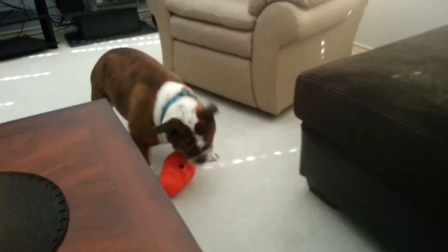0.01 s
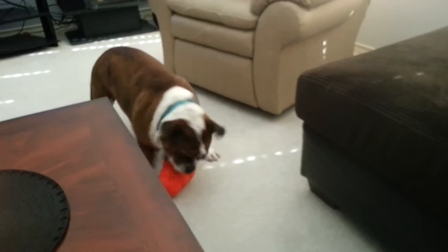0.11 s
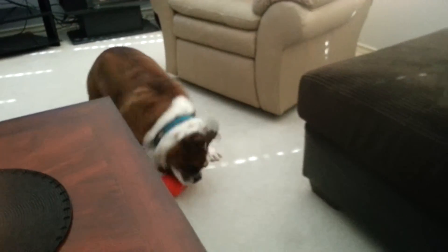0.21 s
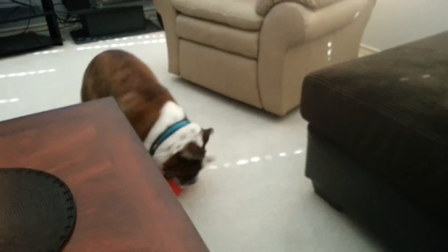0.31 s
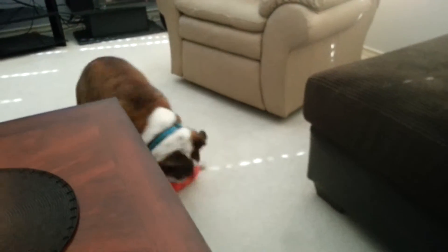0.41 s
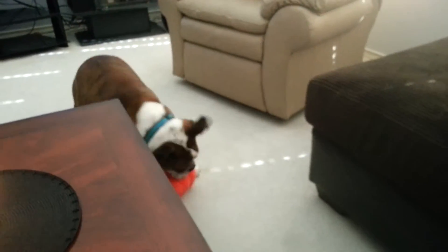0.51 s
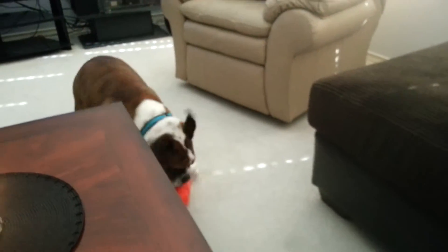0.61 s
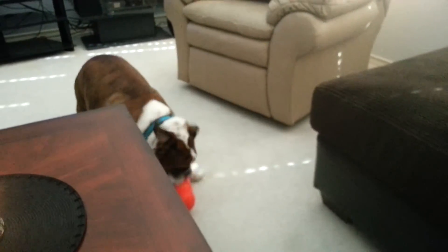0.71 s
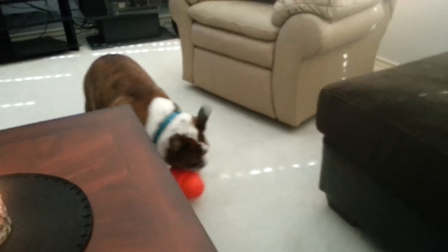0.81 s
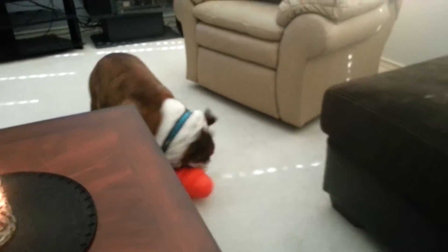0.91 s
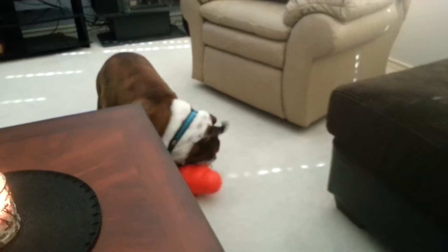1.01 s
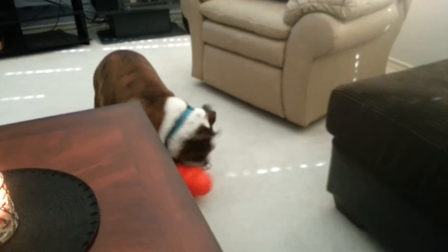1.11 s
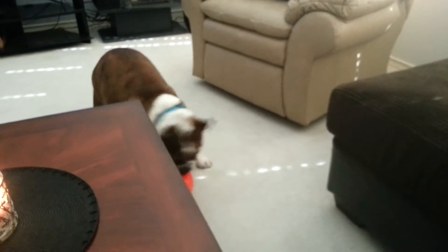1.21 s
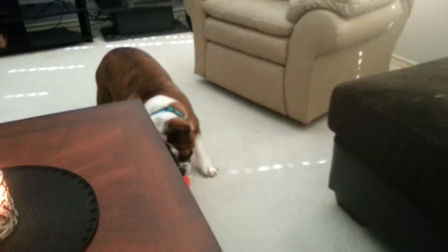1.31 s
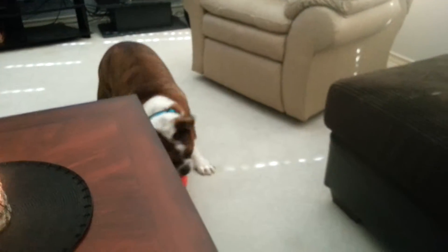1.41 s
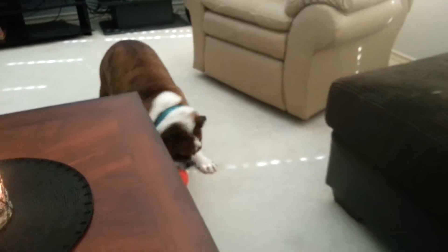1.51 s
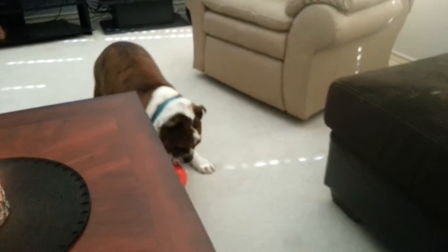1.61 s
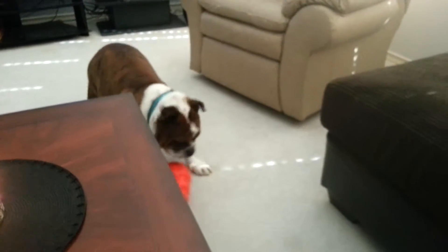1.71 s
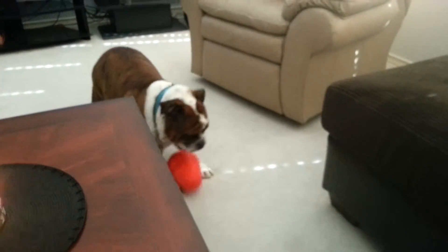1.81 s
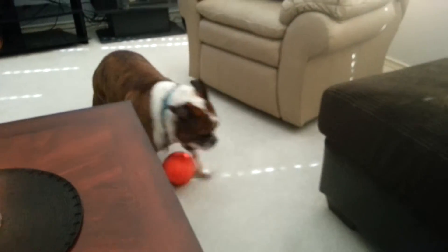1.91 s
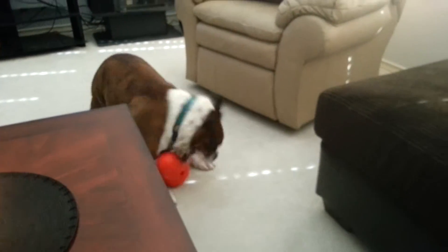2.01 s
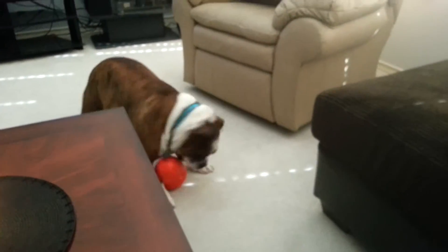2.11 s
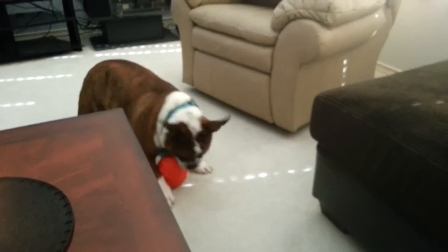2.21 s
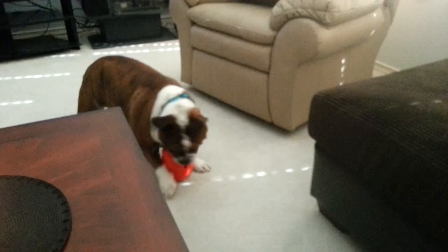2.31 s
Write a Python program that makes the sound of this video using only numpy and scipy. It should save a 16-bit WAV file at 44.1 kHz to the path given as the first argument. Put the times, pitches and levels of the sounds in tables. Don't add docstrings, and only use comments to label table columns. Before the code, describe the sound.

A flat-faced dog gives three rough, fluttering snorts while pushing a hollow rubber ball, with sniffs, scuffs, sharp claw and tooth clicks, soft thumps and jingling tags, in a furnished living room, heard from a phone a couple of metres away.

```python
import sys
import numpy as np
from scipy import signal
from scipy.fft import rfft, irfft, next_fast_len
from scipy.io import wavfile
from scipy.ndimage import uniform_filter1d

SR = 44100
rng = np.random.default_rng(int(sys.argv[2]) if len(sys.argv) > 2 else 0)


def transcribe(u):
    v = np.clip(np.atleast_2d(u).T, -1, 1)
    q = np.round(v * 32767).astype(np.int16)
    wavfile.write(sys.argv[1], SR, q)


def rack_gain(trim_db):
    fader = np.asarray(trim_db, float)
    return 10 ** (fader / 20)


N = 105840
T_S = np.arange(N) / SR
BRIEF_S, SHORT_S, LONG_S = T_S[:400], T_S[:11025], T_S[:22050]


def unit(x):
    return x / np.sqrt(np.mean(x ** 2) + 1e-20)


def band(x, hz, width_hz):
    return signal.lfilter(*signal.iirpeak(hz, hz / width_hz, fs=SR), x)


def body(x, peaks):
    return sum((-1) ** k * rack_gain(db) * unit(band(x, hz, width_hz))
               for k, (hz, width_hz, db) in enumerate(peaks))


def shape(table, hz):
    table_hz, value = np.array(table).T
    return np.interp(np.log(hz + 1), np.log(table_hz), value)


def add(out, start_s, x):
    i = int(start_s * SR)
    out[i:i + len(x)] += x[:N - i]


def ring(hz, t60_s, turn=0.):
    return np.sin(2 * np.pi * (hz * SHORT_S + turn)) * np.exp(-np.log(1000) * SHORT_S / t60_s)


def air():
    # [f/Hz, level/dB per Hz]
    air_spectrum = [(30, -4), (55, -9), (95, -2), (330, 0), (740, -3), (1300, -10), (4800, -9), (6500, -21),
                    (14000, -24)]
    hz = np.fft.rfftfreq(N, 1 / SR)
    mid, side = rfft(rng.standard_normal((2, N))) * rack_gain(shape(air_spectrum, hz))
    side = side * np.clip(hz / 1200, .3, 1)
    return unit(irfft(np.array([mid + side, mid - side]), N)) * rack_gain(-49)


def scuffs():
    # [t/s, swell/s, fade/s per 20 dB, level/dB, centre f/Hz]
    scuff_events = [(0., .005, .15, -45, 900), (.076, .004, .06, -38, 2600), (.078, .01, .06, -44, 1200),
                    (.108, .03, .06, -36, 6500), (.453, .008, .07, -35, 3600), (.555, .01, .25, -45, 950),
                    (.56, .04, .18, -43, 2900), (.74, .03, .15, -45, 2000), (.74, .05, .12, -47, 240),
                    (.905, .035, .06, -44, 6500), (.937, .003, .05, -44, 5500), (.995, .02, .05, -46, 1750),
                    (1.165, .03, .07, -41, 8000), (1.285, .02, .07, -51, 1000),
                    (1.361, .002, .11, -38, 7000), (1.64, .06, .15, -46, 7000),
                    (1.996, .003, .03, -40, 2000), (1.39, .01, .06, -43, 400),
                    (1.817, .004, .075, -32, 3900), (2.003, .02, .06, -33, 4200),
                    (2.006, .02, .06, -35, 8000), (2.08, .01, .08, -37, 4500), (2.17, .04, .08, -48, 2400),
                    (2.17, .04, .07, -52, 7600), (.52, .06, .12, -52, 7600), (1.29, .03, .25, -53, 2800),
                    (1.46, .01, .08, -52, 2750), (.53, .04, .12, -46, 250), (.21, .04, .08, -43, 280),
                    (.22, .03, .08, -43, 1500), (.02, .05, .1, -47, 110), (.88, .05, .1, -50, 110),
                    (1.02, .05, .15, -48, 100), (2.11, .08, .3, -52, 1200), (2.0, .02, .09, -37, 1300),
                    (2.268, .015, .15, -44, 5000), (2.272, .005, .07, -46, 450)]
    grains_hz, grain_db, width_ratio, skirt_db = 9000, 3.5, .7, -4
    out = np.zeros(N)
    for start_s, swell_s, fade_s, db, hz in scuff_events:
        chance, sign, size = rng.random((3, len(LONG_S)))
        grains = (chance < grains_hz / SR) * np.sign(sign - .5)
        grains = grains * rack_gain(-grain_db * np.log(size + .015))
        core = band(band(grains, hz, hz * width_ratio), hz, hz * width_ratio)
        skirt = band(grains, hz, 1.4 * hz)
        tone = unit(core) + rack_gain(skirt_db) * unit(skirt)
        swell = np.minimum(LONG_S / max(swell_s, 1e-3), 1)
        fade = rack_gain(-20 * np.maximum(LONG_S - swell_s, 0) / fade_s)
        add(out, start_s, tone * rack_gain(db) * swell * fade)
    return out


def clicks():
    # [t/s, peak level/dB, pitch f/Hz, rise/s, bright edge re peak/dB]
    click_events = [(.0775, -26, 1300, .0004, -8), (.0783, -28, 2600, .0005, -8),
                    (.089, -28, 1500, .0007, -10), (.2383, -28, 1100, .0005, -8),
                    (.2875, -14, 3250, .0007, -6), (.299, -16, 680, .001, -14), (.319, -13, 700, .0007, -8),
                    (.326, -17, 4400, .0005, -10), (.329, -15, 2370, .0005, -8),
                    (.349, -16, 850, .0007, -10), (.3615, -17, 4200, .0003, -8),
                    (.4511, -14, 3100, .0003, -4), (.4535, -23, 5000, .0005, -8),
                    (.462, -18, 3300, .0004, -4), (.464, -20, 3000, .0004, -6),
                    (.478, -23, 4500, .0005, -8), (.559, -31, 2500, .0004, -6),
                    (1.183, -24, 4280, .0003, -6), (1.711, -24, 1100, .0005, -10),
                    (1.8185, -17, 3900, .001, -2), (1.8305, -22, 4400, .0008, -5),
                    (1.837, -25, 3800, .001, -8), (1.87, -26, 4200, .001, -8),
                    (1.9953, -17, 1200, .0005, -5), (2.0063, -23, 1250, .0005, -6),
                    (2.0078, -17, 3900, .0004, -3), (2.0243, -16, 2600, .0004, -1),
                    (2.0275, -18, 1600, .0004, -3), (2.0335, -23, 8500, .0006, -3),
                    (2.08, -28, 6700, .0003, 0), (2.084, -32, 13500, .0004, -2),
                    (2.088, -26, 6600, .0003, 0), (2.099, -27, 4800, .0008, -6),
                    (2.0241, -21, 12500, .0003, 0), (2.21, -35, 7000, .0003, 0),
                    (2.222, -30, 4800, .0004, -6)]
    upper_ratio, upper_db, edge_s = 1.6, -5, .001
    out = np.zeros(N)
    for start_s, db, hz, rise_s, edge_db in click_events:
        bite = BRIEF_S / rise_s * np.exp(1 - BRIEF_S / rise_s)
        upper = np.sin(2 * np.pi * min(upper_ratio * hz, 15000) * BRIEF_S)
        tone = np.sin(2 * np.pi * hz * BRIEF_S) + rack_gain(upper_db) * upper
        width_hz = 1.8 * min(hz, 6000)
        crack = band(rng.standard_normal(len(BRIEF_S)), hz, width_hz)
        crack = unit(band(crack, min(upper_ratio * hz, 13000), width_hz))
        edge = rack_gain(edge_db) * crack * np.exp(-BRIEF_S / edge_s)
        add(out, start_s, rack_gain(db) * (bite * tone + edge))
    return out


def tags():
    # [t/s, small-tag peak/dB, big-tag level/dB, third-tag level/dB]
    tag_hits = [(0.1106, -46, -50, -48), (0.1274, -46, -42, -43), (0.4179, -38, -35, -48),
                (0.5584, -51, -46, -58), (0.5806, -45, -43, -54), (0.6045, -42, -51, -55),
                (0.6399, -43, -51, -53), (0.7781, -51, -55, -64), (0.9118, -40, -41, -55),
                (0.9374, -40, -38, -51), (1.0944, -46, -41, -48), (1.1677, -40, -41, -53),
                (1.1817, -36, -41, -54), (1.3624, -31, -44, -40), (1.3734, -34, -47, -38),
                (1.3862, -32, -43, -38), (1.7664, -43, -42, -51), (2.0088, -34, -35, -44),
                (2.0444, -43, -33, -45), (2.0872, -40, -37, -53), (2.2089, -49, -43, -58),
                (2.2702, -43, -43, -60), (2.2844, -52, -43, -60)]
    # [f/Hz, level/dB, t60/s]
    small_tag = [(11690, -5, .09), (11780, -1.5, .11), (8900, -18, .08)]
    big_tag = [(4720, 1.5, .1), (4800, .5, .11), (4960, -1.5, .1), (4500, -5, .12)]
    third_tag = [(6460, 3, .13), (6520, -1.5, .1), (6120, -5, .1)]
    level_db, tick_db, bounce_s, spread = -3, 7, .01, .007
    out = np.zeros(N)
    for start_s, db, big_db, third_db in tag_hits:
        modes = []
        for tag, tag_db in ((small_tag, db), (big_tag, big_db), (third_tag, third_db)):
            modes += [(hz, mode_db + tag_db, t60_s) for hz, mode_db, t60_s in tag]
        tick = rack_gain(db + tick_db) * ring(13000, .001)
        for k, luck in enumerate(rng.standard_normal((3, 11))):
            rings = sum(rack_gain(mode_db) * ring(hz * (1 + spread * u), t60_s, 2 * u)
                        for (hz, mode_db, t60_s), u in zip(modes, luck))
            bounce_at_s = start_s + k * bounce_s * np.exp(luck[-1] / 2)
            add(out, bounce_at_s, rack_gain(level_db - 4 * k) * (rings + tick))
    return out


def snorts():
    # [t/s, flutter level/dB, hiss re flutter/dB]
    snort_curves = [
        [(.21, -60, 8), (.24, -41, 5), (.29, -30, 2), (.33, -23.5, 0), (.385, -31, 0), (.42, -45, 4)],
        [(1.005, -58, 3), (1.03, -35, -2), (1.12, -33, 0), (1.175, -36, 0), (1.2, -46, 4), (1.24, -60, 3)],
        [(1.635, -58, -3), (1.67, -38, -2), (1.712, -30.5, -2), (1.78, -32, -3), (1.84, -39, -1), (1.9, -54, 2)],
    ]
    # [f/Hz, width/Hz, level/dB]
    nose_peaks = [
        [(230, 160, -5), (380, 90, -6), (640, 70, -2), (800, 90, -8), (955, 60, -3), (1400, 500, -14)],
        [(150, 80, -13), (285, 70, -4), (638, 40, -1.5), (870, 70, -6), (960, 90, -8), (1700, 200, -12)],
        [(200, 70, -3), (330, 120, -8), (700, 150, -6), (880, 90, -5), (1110, 160, -3), (1330, 250, -8)],
    ]
    flutter_rates = [62, 46, 48]
    # [f/Hz, width/Hz, level/dB]
    hiss_peaks = [(1900, 900, -7), (2850, 700, -2.5), (3700, 800, -1), (4600, 900, 0), (7000, 3000, -7),
                  (10500, 3000, -20)]
    jitter, scatter_db, hiss_gating = .2, 2.5, .9
    puff_share, puff_decay_cycles, puff_leak = .8, .3, .25
    out = np.zeros(N)
    for curve, nose, hz in zip(snort_curves, nose_peaks, flutter_rates):
        knot_s, flutter_db, hiss_db = np.array(curve).T
        period_luck, size_luck = rng.standard_normal((2, 100))
        puff_air, hiss_air = rng.standard_normal((2, len(LONG_S)))
        flaps_s = np.cumsum(np.exp(jitter * period_luck) / hz)
        turns = np.interp(LONG_S, flaps_s, np.arange(len(flaps_s)))
        cycle = turns.astype(int)
        size = rack_gain(scatter_db * size_luck)[cycle]
        gate = (puff_leak + np.exp(-(turns - cycle) / puff_decay_cycles)) * size
        flap = unit(np.diff(cycle, prepend=0) * size)
        puff = unit(gate * puff_air)
        voice = unit(body((1 - puff_share) * flap + puff_share * puff, nose))
        hiss = unit(body((1 + hiss_gating * unit(gate)) * hiss_air, hiss_peaks))
        at_s = LONG_S + knot_s[0]
        level = rack_gain(np.interp(at_s, knot_s, flutter_db)) * (LONG_S < knot_s[-1] - knot_s[0])
        add(out, knot_s[0], level * (voice + rack_gain(np.interp(at_s, knot_s, hiss_db)) * hiss))
    return out


def knocks():
    # [t/s, peak level/dB, pitch f/Hz]
    thump_events = [(0.459, -25, 172), (0.559, -35, 178), (0.759, -36, 207), (0.799, -36, 186),
                    (0.819, -36, 283), (0.945, -40, 194), (1.177, -26, 277), (1.209, -34, 288),
                    (1.397, -35, 318), (1.411, -35, 272), (1.974, -36, 253), (2.029, -35, 205),
                    (2.069, -38, 91.5), (2.271, -35, 248)]
    cycles, boom_hz, boom_db, push_s = 5, 85, -15, .0003
    soft = np.zeros(N)
    for start_s, db, hz in thump_events:
        hollow = ring(hz, cycles * 3 / hz)
        boom = rack_gain(boom_db) * ring(boom_hz, .12)
        overtone = rack_gain(-8) * ring(2.2 * hz, .03)
        add(soft, start_s, rack_gain(db - 3) * (hollow + boom + overtone))
    push = np.exp(-BRIEF_S / push_s) * BRIEF_S
    return np.convolve(soft, push / push.sum())[:N]


def room(x):
    # [f/Hz, t60/s]
    room_decay = [(150, .4), (600, .26), (2500, .27), (8000, .22)]
    gap_s, wide_hz = .003, 900
    tail = 0
    for hz, t60_s in room_decay:
        mid = unit(band(rng.standard_normal(len(LONG_S)), hz, 1.2 * hz))
        side = unit(band(rng.standard_normal(len(LONG_S)), hz, 1.2 * hz))
        cloud = mid + min(hz / wide_hz, 1) * side * np.array([[1], [-1]])
        tail = tail + np.sqrt(hz) * cloud * rack_gain(-60 * LONG_S / t60_s) * (LONG_S > gap_s)
    size = next_fast_len(N + len(LONG_S))
    spec = rfft(tail, size)
    power = uniform_filter1d(np.abs(spec) ** 2, size=4001, mode="mirror")
    flat = spec / np.sqrt(power)
    return irfft(rfft(x, size) * flat, size)[:, :N]


def two_ports(x):
    # [f/Hz, left re right/dB]
    left_right = [(100, -.6), (1000, -.6), (2500, 5), (5000, 5), (9000, -1.5), (13000, 11)]
    left_lag_s = 2.7 / SR
    size = next_fast_len(N + 512)
    hz = np.fft.rfftfreq(size, 1 / SR)
    half = rack_gain(shape(left_right, hz) / 2) * np.exp(-1j * np.pi * hz * left_lag_s)
    return irfft(rfft(x, size) * np.array([half, 1 / half]), size)[:, :N]


def scene():
    room_db, click_room_db = -.5, -2
    sharp = clicks()
    dog = scuffs() + tags() + snorts() + knocks()
    reverb = room(dog + rack_gain(click_room_db) * sharp)
    return two_ports(dog + sharp) + rack_gain(room_db) * reverb + air()


def band_limit(x):
    return signal.sosfilt(signal.butter(12, 15800, fs=SR, output="sos"), x)


def record(dry):
    low_cut = signal.butter(3, 70, "high", fs=SR, output="sos")
    top_cut = signal.cheby2(5, 35, 15700, fs=SR, output="sos")
    mix = signal.sosfilt(np.vstack([low_cut, top_cut]), dry)
    return band_limit(mix)


dry = scene()
out = record(dry)
transcribe(out)
```